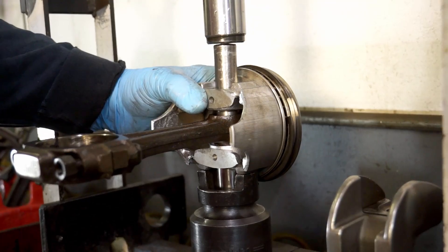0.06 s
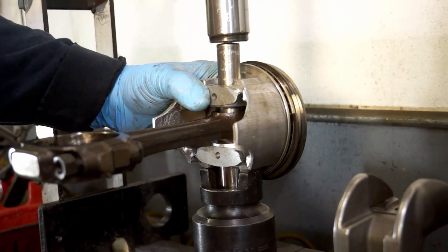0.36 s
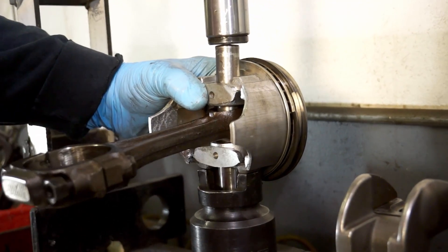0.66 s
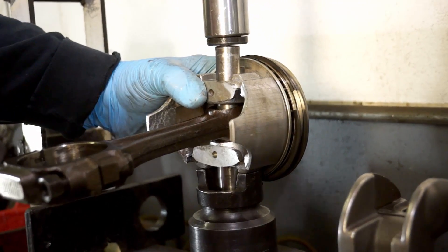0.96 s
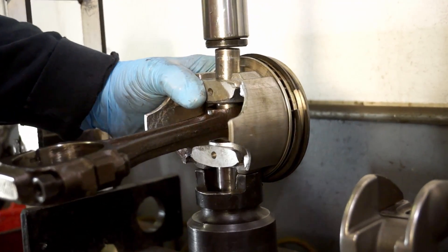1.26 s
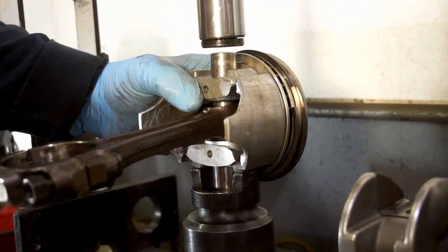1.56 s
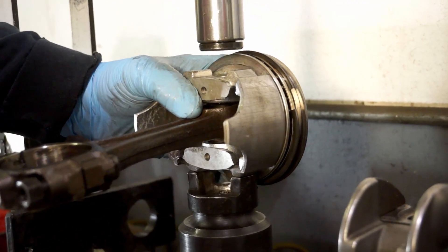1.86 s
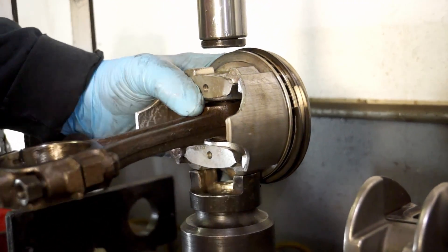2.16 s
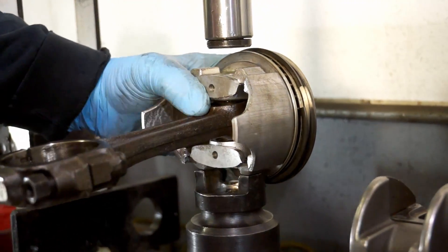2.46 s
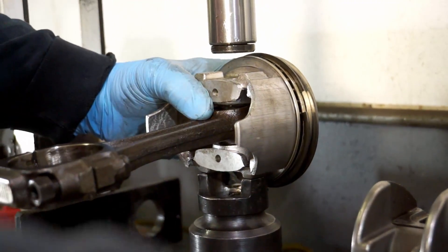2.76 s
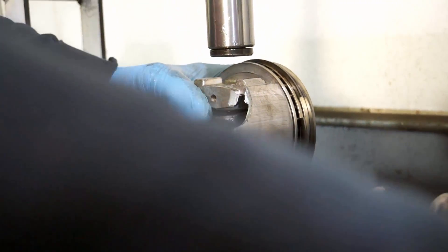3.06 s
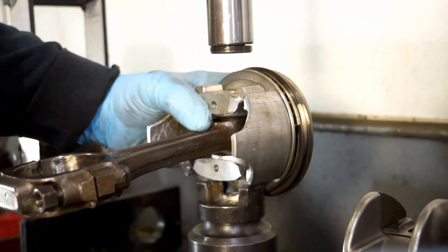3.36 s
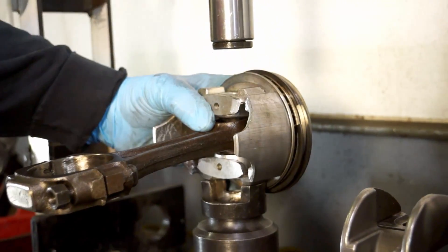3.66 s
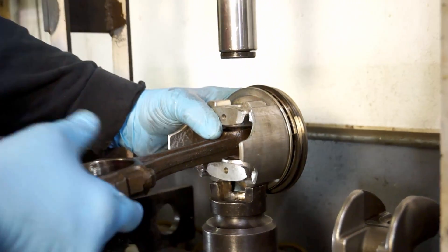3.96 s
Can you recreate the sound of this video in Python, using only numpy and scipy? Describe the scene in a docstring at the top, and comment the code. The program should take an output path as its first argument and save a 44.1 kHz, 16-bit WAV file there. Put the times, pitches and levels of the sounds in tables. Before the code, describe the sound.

Loud pulsing hiss of a pneumatic pump stops abruptly, followed by valve whistles and metal clanks.

```python
"""A loud exhaust hiss, pulsed by about twenty knocks a second: an air-driven workshop pump runs free,
takes up load and cuts off. Each stroke knocks the body and briefly chokes the turbulent exhaust.
The valve thumps, rattles and whistles twice as the pressure escapes through a narrow gap.
Steel parts, shifted on the fixture, clank and ring in their natural modes, and a heavy one is set down.
Mains hum and a faint wandering whine remain in the room."""
import sys
import numpy as np
from scipy import signal
from scipy.fft import rfft, irfft
from scipy.io import wavfile
from scipy.ndimage import uniform_filter1d

SR = 44100
rng = np.random.default_rng(int(sys.argv[2]) if len(sys.argv) > 2 else 0)


def store_pcm(level_fs):
    """Save levels as 16-bit WAV."""
    pcm = np.round(np.clip(level_fs, -1, 1) * 32767).astype(np.int16)
    wavfile.write(sys.argv[1], SR, np.atleast_2d(pcm).T)


N = 176400
T = np.arange(N) / SR
STOP_S = 1.799  # the pump cuts off


def amp(db):
    """Decibel law: 20 dB is a factor of ten in amplitude."""
    return 10 ** (np.asarray(db) / 20)


def unit(x):
    """Normalisation to an rms of 1."""
    return x / np.sqrt(np.mean(x ** 2) + 1e-20)


def curve(rows, column=1):
    """Linear interpolation of one column of a time table at every sample."""
    rows = np.array(rows)
    return np.interp(T, rows[:, 0], rows[:, column])


def read(points, hz):
    """Interpolation of a spectrum on a logarithmic frequency axis."""
    f, value = np.transpose(points)
    return np.interp(np.log(hz + 1), np.log(f + 1), value)


def add(mix, s, sound):
    """Superposition: a sound joins the mix at time s."""
    at = round(s * SR)
    sound = sound[max(-at, 0):]
    part = mix[max(at, 0):][:len(sound)]
    part += sound[:len(part)]


def noise(gain_at):
    """Spectral shaping: white noise weighted by a gain at each frequency, at rms 1."""
    spectrum = rfft(rng.standard_normal(N)) * gain_at(np.fft.rfftfreq(N, 1 / SR))
    return unit(irfft(spectrum, N))


def coloured(points):
    """Coloured noise with a tabulated spectrum."""
    return noise(lambda f: amp(read(points, f)))


def band(hz, width):
    """Resonance excited by noise; centred on 0 Hz, a slow random wander."""
    return noise(lambda f: 1 / (1 + ((f - hz) / width) ** 2))


def impulse_response(points, size=4096):
    """Minimum-phase response of unit energy, derived from a magnitude spectrum."""
    log_gain = np.log(amp(read(points, abs(np.fft.fftfreq(size, 1 / SR)))) + 1e-5)
    click = np.fft.ifft(np.exp(np.conj(signal.hilbert(log_gain)))).real
    return click / np.linalg.norm(click)


def room(x, wet_db):
    """Reverberation: a diffuse tail, decaying exponentially in each band, joins the direct sound."""
    # reverberation time (frequency [Hz], T60 [s])
    decay_times = [(100, 1), (400, 0.32), (1500, 0.45), (4000, 0.54), (9000, 0.27), (15000, 0.28)]
    hz, t, spectra = signal.stft(rng.standard_normal(SR), SR, nperseg=256)
    tail = signal.istft(spectra * amp(-60 * t / read(decay_times, hz)[:, None]), SR, nperseg=256)[1]
    tail *= np.minimum(T[:len(tail)] / 0.02, 1) ** 2
    return x + amp(wet_db) * signal.fftconvolve(x, tail / np.linalg.norm(tail))[:N]


def knock(hz, decay_s):
    """Damped oscillation: a pressure swing whose envelope peaks at decay_s."""
    t = T[:SR // 5]
    return t / decay_s * np.exp(1 - t / decay_s) * np.sin(2 * np.pi * hz * t)


def strike(blows, colour, modes, ring_db, attack_s=.001):
    """Impact excitation: contact noise is filtered by the body, whose modes then ring freely."""
    contact, ring, t = np.zeros(N), np.zeros(N), T[:SR]
    for s, db, decay_s in blows:
        add(contact, s, amp(db) * rng.standard_normal(SR) * np.exp(-t / decay_s))
        tones = sum(amp(mode_db - 60 * t / t60) * np.sin(2 * np.pi * (hz * t + rng.random()))
                    for hz, mode_db, t60 in modes)
        add(ring, s, amp(db + ring_db) * tones * np.minimum(t / attack_s, 1))
    return signal.fftconvolve(contact, impulse_response(colour))[:N] + ring


def room_air():
    """Ambient noise: a broadband floor, strongest in the bass, that slowly rises."""
    # noise spectrum (frequency [Hz], level [dB])
    colour = [(15, -40), (25, -1), (122, -5), (144, -7.5), (188, -21.5), (246, -5.5), (289, -14),
              (368, -18.5), (523, -26.5), (826, -29.5), (2300, -42.5), (3930, -41.5), (4620, -48),
              (10900, -43), (15500, -51.5)]
    # envelope (time [s], level [dB])
    levels = [(0, -60), (2.35, -53), (2.9, -51), (3.3, -46), (3.6, -44), (4, -43)]
    return amp(curve(levels)) * coloured(colour)


def mains_hum(hz=120):
    """Harmonic series: low partials hum and high ones buzz, with a thin tone riding on them."""
    # low partials (harmonic number, level [dB])
    partials = [(1, -4), (2, -14.5), (3, -20), (4, -28.5), (7, -28), (8, -44), (10, -30.5), (11, -35)]
    # envelope (time [s], level [dB])
    levels = [(0, -40), (2.3, -51.5), (2.75, -46.5), (3.3, -43), (3.7, -38.5), (4, -36.5)]
    hum = sum(amp(db + 0.63 * band(0, 4)) * np.sin(2 * np.pi * (round(k) * hz * T + rng.random()))
              for k, db in partials)
    buzz = sum(amp(-41 - 5 * np.log2(k / 12) + 3 * rng.standard_normal())  # falls 5 dB per octave
               * np.sin(2 * np.pi * (k * hz * T + rng.random())) for k in range(12, 60))
    thin_tone = amp(-38) * band(4060, 8)
    return np.sqrt(2) * amp(curve(levels)) * (hum + buzz + thin_tone)


def fuzzy(phase):
    """Random modulation wraps a tone in narrow noise sidebands."""
    return .6 * np.sin(phase) + .7 * (band(0, 400) * np.cos(phase) + band(0, 300) * np.sin(phase))


def whine():
    """Frequency modulation: two faint inharmonic partials wander together."""
    # glide of the lower partial (time [s], frequency [Hz], level [dB])
    glide = [(3.29, 10470, -92), (3.38, 12000, -76), (3.465, 10400, -74), (3.51, 11000, -72),
             (3.6, 9450, -72), (3.685, 11200, -65), (3.76, 9400, -68), (3.81, 9050, -74),
             (3.885, 7800, -76), (3.92, 7600, -95)]
    phase = 2 * np.pi * np.cumsum(uniform_filter1d(curve(glide), size=1200)) / SR
    tones = fuzzy(phase) + amp(-14) * fuzzy(1.21 * phase)
    level = amp(curve(glide, column=2)) * (T > glide[0][0]) * (T < glide[-1][0])
    return np.sqrt(2) * level * tones


def clanks():
    """Modal vibration: steel parts knock together and ring at inharmonic frequencies."""
    # impacts (time [s], level [dB], decay [s])
    blows = [(1.907, -36, 0.0037), (1.996, -38, 0.0045), (2.014, -38.5, 0.012), (2.141, -49, 0.0044),
             (2.193, -45, 0.0046), (2.393, -31, 0.0019), (2.41, -41, 0.0037), (2.4365, -19, 0.0051),
             (2.445, -18, 0.0054), (2.481, -20.5, 0.0073), (2.601, -16.5, 0.0071), (2.6145, -11.5, 0.0034),
             (2.644, -32, 0.0027), (2.663, -23.5, .004), (2.905, -50.5, 0.018)]
    # contact spectrum (frequency [Hz], level [dB])
    colour = [(120, -68.5), (200, -15), (337, -16.5), (551, -1.5), (721, -7), (1240, -17.5), (1520, -16.5),
              (1780, -14), (2600, -13.5), (2810, -14.5), (3740, -16), (5300, -20.5), (6110, -24.5),
              (8130, -30.5), (8800, -34), (11400, -134), (19400, -120)]
    # natural modes (frequency [Hz], level [dB], T60 [s])
    modes = [(439, -3.5, 0.13), (517, 9, 0.051), (960, -11, 0.049), (1197, -3, 0.1), (1350, -3.5, 0.089),
             (1783, -8, 0.16), (2260, -13, 0.15), (3065, -12, 0.15), (4300, -21, .14), (5340, -10.5, 0.065)]
    return room(strike(blows, colour, modes, ring_db=-12), wet_db=-15.5)


def pings():
    """Light damping: high modes of the metal ring on after two bright ticks."""
    # ticks (time [s], level [dB], decay [s])
    blows = [(2.2135, -21, 0.0095), (2.4365, -31, 0.0048)]
    # contact spectrum (frequency [Hz], level [dB])
    colour = [(470, -27), (800, -11), (1390, -13), (1840, -20.5), (2940, -7), (3280, -9.5), (4350, -4),
              (5100, -18), (8220, -29), (9070, -15.5), (10100, -48), (11300, -26), (15000, -48)]
    # natural modes (frequency [Hz], level [dB], T60 [s])
    modes = [(2980, -20, 0.28), (3010, -23, .5), (3980, -21, 0.18), (4320, 15.5, 0.031), (4330, -18, 0.31),
             (4371, -28, 0.36), (6340, -24, 0.18), (8672, -31, 0.38), (10650, -22, 0.16),
             (12280, -18, 0.095), (13500, -29.5, 0.13)]
    return room(strike(blows, colour, modes, ring_db=-5.5), wet_db=-18.5)


def clunks():
    """Impact of a large mass: a heavy part is set down and excites a deep mode under its ring."""
    # contacts (time [s], level [dB], decay [s])
    blows = [(3.018, -40, 0.0047), (3.032, -18, 0.0085), (3.051, -31.5, 0.0058), (3.061, -30.5, 0.0077),
             (3.106, -40, .012)]
    # contact spectrum (frequency [Hz], level [dB])
    colour = [(35, -21), (65, -6), (120, -1.5), (200, -7), (400, -1.5), (760, -9), (940, -12.5),
              (1150, -10.5), (1600, -17.5), (2650, -12), (3660, -21.5), (4840, -26), (5300, -23.5),
              (6500, -29), (10600, -22.5), (15000, -39)]
    # natural modes (frequency [Hz], level [dB], T60 [s])
    modes = [(84, 0, .3), (544, -6, .13), (700, -5, .13), (830, -8, .12), (2476, -15, .14),
             (2912, -16, .14), (5190, -14, .14), (8027, -18, .1), (9367, -16, .1), (10810, -18, .13)]
    return room(strike(blows, colour, modes, ring_db=-11), wet_db=-8)


def valve_thumps():
    """Heavy damping: each shift of the valve gives a dull, short-lived pressure swing."""
    # thumps (time [s], level [dB], frequency [Hz], decay [s])
    shifts = [(0.5011, -11.5, 382, 0.0013), (.508, -16, 452, 0.0032), (1.7968, -9.5, 453, 0.00092),
              (2.035, -21, 314, 0.0028), (2.046, -10.5, 343, 0.0014), (2.056, -23.5, 208, 0.0056),
              (2.1996, -17.5, 205, 0.0036), (2.514, -27, 308, 0.01)]
    thumps = np.zeros(N)
    for s, db, hz, decay_s in shifts:
        add(thumps, s, amp(db) * knock(hz, decay_s))
    return room(thumps, wet_db=-18)


def valve_rattle():
    """Repeated impact: the valve rattles as it seats, exciting low modes."""
    # contacts (time [s], level [dB], decay [s])
    blows = [(1.795, -34, 0.0035), (2.033, -21, 0.01), (2.047, -13.5, 0.0038), (2.06, -41, 0.013),
             (2.14, -40, .015), (2.199, -24, 0.0047)]
    # contact spectrum (frequency [Hz], level [dB])
    colour = [(80, -20), (200, -2), (262, -12), (315, -0.5), (400, -4), (520, -0.5), (700, -9), (1100, -18),
              (1320, -17), (1600, -24), (2700, -36.5), (7000, -62)]
    # natural modes (frequency [Hz], level [dB], T60 [s])
    modes = [(312.4, 0, 0.51), (211, -5, 0.26), (526, -2.5, 0.13), (1293, -12, .06)]
    return room(strike(blows, colour, modes, ring_db=-17), wet_db=-12)


def valve_whistle(hz=9350, waver_hz=14):
    """Flow-induced oscillation: air forced through a narrow gap sounds a piercing tone."""
    # one envelope for each whistle (time [s], level [dB])
    envelopes = [
        [(1.797, -62), (1.802, -27), (1.826, -40), (1.86, -26.5), (1.892, -21.5), (1.932, -40), (1.96, -26.5),
         (1.995, -19), (2.011, -36.5), (2.022, -22), (2.044, -25), (2.056, -50.5), (2.16, -37), (2.21, -59.5),
         (2.29, -63), (2.42, -88)],
        [(2.436, -70), (2.452, -26.5), (2.495, -44.5), (2.514, -21.5), (2.555, -29), (2.6, -35), (2.65, -48),
         (2.78, -53), (2.92, -93)],
    ]
    level = sum(amp(curve(rows)) * (T > rows[0][0]) * (T < rows[-1][0]) for rows in envelopes)
    phase = 2 * np.pi * np.cumsum(hz + waver_hz * band(0, 25)) / SR
    return level * (np.sqrt(2) * np.sin(phase) + amp(-23) * band(hz, 120))


def valve_seat():
    """Resonance: the seat sings along with the first whistle in three brief swells."""
    # seat tones (frequency [Hz], level [dB])
    tones = [(650, -39), (1777, -45), (3268, -44)]
    # Gaussian swells (time [s], half-width [s], level [dB])
    swells = [(1.87, 0.021, 2.5), (1.96, 0.0086, -9.5), (1.991, 0.0087, -4.5)]
    level = sum(amp(db) * np.exp(-((T - s) / half) ** 2) for s, half, db in swells)
    return level * sum(amp(db) * np.sqrt(2) * np.sin(2 * np.pi * hz * T) for hz, db in tones)


def valve_bleed():
    """Turbulence: air escapes in a soft rush once the pump has stopped."""
    # flow spectrum (frequency [Hz], level [dB])
    colour = [(59, -31), (100, 0), (487, -12.5), (647, -10.5), (772, -13.5), (1780, -18.5), (2830, -26),
              (3380, -24), (7000, -32), (9100, -70), (15400, -120)]
    # envelope (time [s], level [dB])
    levels = [(1.79, -62), (1.81, -36.5), (1.93, -43), (2.02, -51.5), (2.08, -67), (2.18, -59), (2.3, -55)]
    return amp(curve(levels)) * (T > STOP_S) * coloured(colour)


def throb(load_s=0.46, rise_s=.12):
    """Forced vibration: two orders of the pump grow as it takes up load."""
    # pump orders (frequency [Hz], level [dB])
    orders = [(107.7, -38), (323.1, -43)]
    load = np.clip((T - load_s) / rise_s, .1, 1)
    return load * sum(amp(db + 0.5 * band(0, 8)) * np.sin(2 * np.pi * hz * T + 0.21 * band(0, 6))
                      for hz, db in orders)


def strokes(decay_s=0.0015, rebound_s=0.01195, dip_delay_s=0.0061, dip_half_s=0.0068):
    """Periodic impact: strokes knock, rebound and choke the exhaust. Returns knocks and dip in dB."""
    # running free, then loaded (start [s], end [s], stroke rate [1/s], knock level [dB],
    # knock frequency [Hz], relative rebound level [dB], exhaust dip [dB])
    runs = [(-.002, .47, 20.1, -20, 471, -6.5, 5.5), (0.5388, 1.76, 21.55, -22, 412, -12, 2.5)]
    knocks, dip = np.zeros(N), np.zeros(N)
    closure = np.exp(-(T[:SR // 10] / dip_half_s - 3) ** 2)
    for start, end, rate, start_db, hz, rebound_db, dip_db in runs:
        for s in np.arange(start, end, 1 / rate):
            jitter, force, detune = rng.standard_normal(3)
            db = start_db - 1.5 * (s - start)  # the knocks soften as the pressure builds
            add(knocks, s + .0001 * jitter, amp(db + 1.5 * force) * knock(hz * np.exp(.06 * detune), decay_s))
            add(knocks, s, amp(db - 27.5) * knock(hz=446.5, decay_s=0.015))  # the pump body rings
            rebound = knock(hz * np.exp(.06 * jitter), decay_s * 1.7)
            add(knocks, s + rebound_s, amp(db + rebound_db) * rebound)
            add(dip, s + dip_delay_s - 3 * dip_half_s, dip_db * closure)
    return knocks, dip


def exhaust(hollow_hz=430, hollow_octaves=.55):
    """Jet noise: turbulent air roars, hisses and excites the housing. Returns roar and hiss."""
    # envelopes (time [s], roar level [dB], hiss level [dB])
    levels = [(0.0, -27, -32), (0.024, -34, -29.5), (0.042, -32, -30.5), (0.56, -32, -31.5),
              (0.892, -29.5, -29), (1.74, -28.5, -28), (1.75, -28, -27.5)]
    # roar spectrum (frequency [Hz], level [dB])
    roar_colour = [(35, -56), (60, -10), (101, -0.5), (118, -16.5), (146, -5), (177, -4.5), (255, -11.5),
                   (321, -0.5), (360, -7), (630, -1.5), (721, -6), (793, -8), (926, -7.5), (1060, 0),
                   (1210, -5.5), (1360, -6), (1530, -4.5), (1680, -10), (1850, -2.5), (2570, -6),
                   (3300, -15.5), (4160, -14.5), (6000, -25), (7800, -51), (13200, -120)]
    # hiss spectrum (frequency [Hz], level [dB])
    hiss_colour = [(2940, -25), (5000, -11), (6520, -11), (8350, -6.5), (9090, -7), (12600, 0.5),
                   (14600, -3), (15600, -8)]
    # housing resonances (frequency [Hz], half-width [Hz], level [dB])
    resonances = [(733, 28, -37), (1078, 38, -38), (1863, 98, -38.5), (2070, 160, -40), (2543, 160, -35.5)]

    def roar_gain(hz):
        """A shallow spectral notch hollows the roar where the knocks sound."""
        hollow_db = -3 * np.exp(-(np.log2((hz + 1) / hollow_hz) / hollow_octaves) ** 2)
        return amp(read(roar_colour, hz) + hollow_db)

    effort = amp(curve(levels))
    roar = effort * amp(1.5) * noise(roar_gain)
    housing = unit(effort) * sum(amp(db) * band(hz, width) for hz, width, db in resonances)
    hiss = amp(curve(levels, column=2) + 0.5) * coloured(hiss_colour)
    return roar + housing, hiss


def pump(stop_fade_s=0.0018, puff_s=1.6, puff_half_s=0.016):
    """Amplitude modulation: the strokes pulse the exhaust; a small puff comes before the cut-off."""
    knocks, dip_db = strokes()
    flow = unit(amp(-dip_db + .7 * band(0, 70)))
    roar, hiss = exhaust()
    running = np.exp(-np.maximum(T - STOP_S, 0) / stop_fade_s)
    puff = amp(-14) * np.exp(-((T - puff_s) / puff_half_s) ** 2) * hiss
    return room(running * (flow * (roar + hiss) + throb()) + knocks + puff, wet_db=-27)


def scene():
    """Superposition: all sources sum at one close listening point."""
    machine = pump() + valve_thumps() + valve_rattle() + valve_whistle() + valve_seat() + valve_bleed()
    steel_parts = clanks() + pings() + clunks()
    background = mains_hum() + whine() + room_air()
    return (machine + steel_parts + background)[None]


def record(dry):
    """Band limiting: a linear-phase low-pass filter removes the highest treble."""
    low_pass = signal.firwin(801, cutoff=15720, window=("kaiser", 9), fs=SR)
    return signal.oaconvolve(dry, low_pass[None], "same")


dry = scene()
out = record(dry)
store_pcm(out)
```